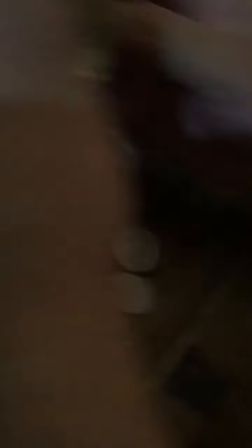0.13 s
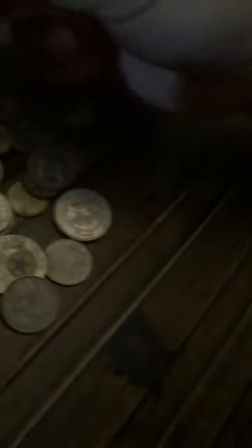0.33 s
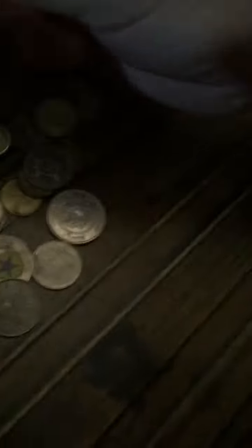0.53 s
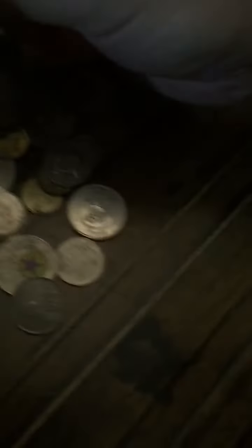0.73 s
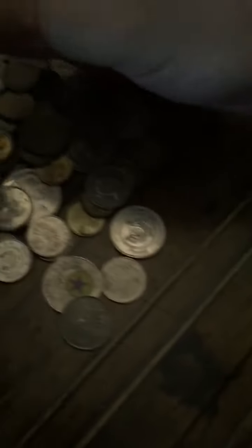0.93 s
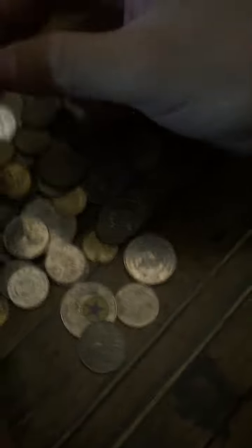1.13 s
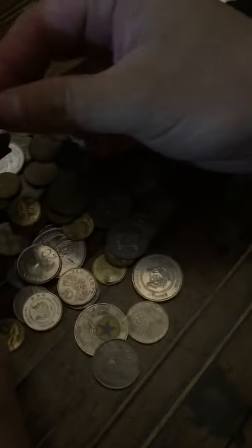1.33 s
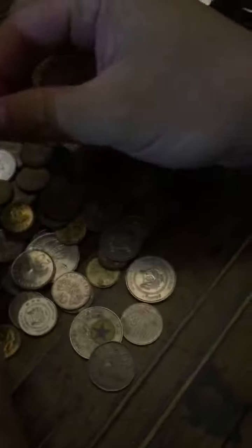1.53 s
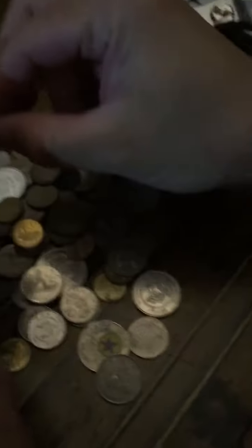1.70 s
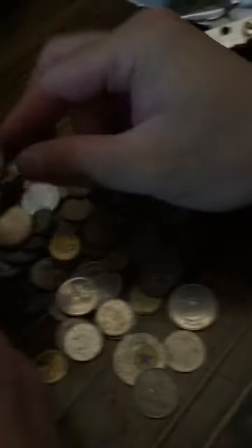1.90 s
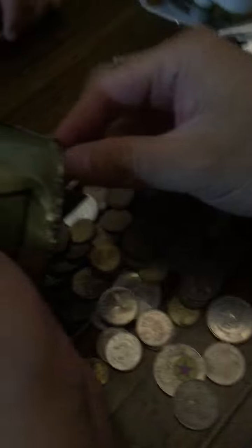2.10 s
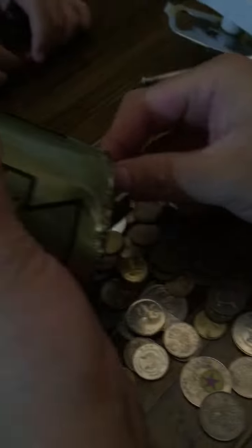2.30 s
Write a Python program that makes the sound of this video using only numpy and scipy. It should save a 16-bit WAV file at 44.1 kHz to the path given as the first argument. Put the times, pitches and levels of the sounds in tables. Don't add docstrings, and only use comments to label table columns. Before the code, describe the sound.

Coins clatter in uneven bursts onto a coin pile on wooden boards, with faint scraping between

```python
import sys
import numpy as np
from scipy import signal
from scipy.fft import rfft, irfft
from scipy.io import wavfile

SR = 44100
rng = np.random.default_rng(int(sys.argv[2]) if len(sys.argv) > 2 else 0)


def store_wav(level_fs):
    pcm = np.round(np.clip(np.atleast_2d(level_fs), -1, 1) * 32767)
    wavfile.write(sys.argv[1], SR, pcm.T.astype(np.int16))


def magnitude_from_level(level_db):
    exponent = np.asarray(level_db, float) / 20
    return 10 ** exponent


N = 103635

COIN_HZ = [13200, 10300, 11200, 11200, 12250, 15050, 12200, 13480, 12140, 14800, 12350, 13500, 12000, 12200,
           14815, 13020, 14820, 13490, 11500, 11500, 12200, 9440, 9440, 13500, 14800, 9440, 14830, 3680,
           12400, 13300, 11900, 7700]
CONTACTS_PER_S = 1000


def read(points, hz):
    f, value = np.transpose(points)
    return np.interp(np.log(hz + 1), np.log(f + 1), value)


def evened(x):
    return x / np.sqrt(np.mean(x ** 2) + 1e-20)


def add(mix, start_s, sound):
    part = mix[round(start_s * SR):][:len(sound)]
    part += sound[:len(part)]


def colour(x, points):
    hz = np.fft.rfftfreq(len(x), 1 / SR)
    return irfft(rfft(x) * magnitude_from_level(read(points, hz)), len(x))


def modes(t, hz, db, t60_s):
    hz, db, t60_s = (np.reshape(v, (-1, 1)) for v in (hz, db, t60_s))
    return (magnitude_from_level(db - 60 * t / t60_s) * np.sin(2 * np.pi * hz * t)).sum(0)


def burst(db, hz, octaves, t60_s):
    t, f = np.arange(2048) / SR, np.fft.rfftfreq(2048, 1 / SR)
    away = np.log2((f + 1) / hz) / octaves
    skirt_db = -6 * away ** 2 * np.where(away < 0, 1.6, 1)
    noise = evened(irfft(rfft(rng.standard_normal(2048)) * magnitude_from_level(skirt_db)))
    return noise * magnitude_from_level(db - 60 * t / t60_s) * np.minimum(t / 0.0006, 1)


def sparse(per_s):
    spread_db = 3
    size = magnitude_from_level(spread_db * np.minimum(rng.exponential(1, N), 2.5)) * rng.choice([-1., 1.], N)
    return evened(size * (rng.random(N) < per_s / SR))


def clumps(per_s):
    return np.interp(np.arange(N) / SR * per_s, np.arange(N // 50), rng.standard_normal(N // 50))


def landing(start_s, tick_db, clack_db, clack_hz):
    chatter_s, clack_t60_s = 0.0025, 0.016
    clack_db = clack_db + 2.5
    delay_s = -chatter_s * np.log(rng.random(12))
    rebound = 1.14 * (2 * rng.random(12) - 1) ** 3
    hits = np.zeros(1000)
    np.add.at(hits, np.minimum(delay_s * SR, 999).astype(int), rebound)
    hits[0] = 1
    coin = burst(tick_db - 5.5, 10900, octaves=1, t60_s=0.0084)
    heap = burst(clack_db, clack_hz, octaves=1, t60_s=clack_t60_s)
    ping = modes(np.arange(2048) / SR, clack_hz, clack_db - 15, 1.4 * clack_t60_s)
    return start_s, np.convolve(coin + heap + ping, hits / np.linalg.norm(hits))


def tick(start_s, db, hz):
    return start_s, burst(db, hz, octaves=0.64, t60_s=0.0069)


def ring(start_s, db, free_s, hz):
    ring_t60_s, catch_t60_s, attack_s = 0.25, 0.02, 0.00078
    twin_ratio, twin_db = 1.011, -11
    waver, flutter_db = 0.002, 3.5
    db = db - 8
    t = np.arange(0, free_s + 0.05, 1 / SR)
    pitch_swing, level_swing = [np.interp(t, np.arange(80) * 0.003, row) for row in rng.standard_normal((2, 80))]
    warped_t = np.cumsum(1 + waver * pitch_swing) / SR
    tone = modes(warped_t, [hz, hz * twin_ratio], [db, db + twin_db], ring_t60_s)
    caught = magnitude_from_level(-60 * np.maximum(t - free_s, 0) / catch_t60_s)
    return start_s, tone * magnitude_from_level(flutter_db * level_swing) * np.minimum(t / attack_s, 1) * caught


def thud(start_s, db, centre_hz):
    # mode_hz, level_db, t60_s
    boards = [(119, -2.5, 0.28), (203.8, -11, 0.35), (280, 2.5, 0.032), (387.7, 2.5, 0.037),
              (480, 2.5, 0.049), (722, 12, 0.015), (940, -3, 0.023), (1460, -17.5, 0.048)]
    hz, mode_db, t60_s = np.transpose(boards)
    away_db = 0.3 * db * abs(np.log2(hz / centre_hz))
    t = np.arange(0, 0.4, 1 / SR)
    sound = modes(t, hz * rng.uniform(0.97, 1.02, len(hz)), db + mode_db + away_db, t60_s)
    add(sound, 0, burst(db + 5.5, centre_hz, octaves=0.79, t60_s=0.036))
    return start_s, sound * (1 - np.exp(-t * centre_hz * 2))


def rattle():
    spill_s = [0, .248, .345, .451, .599, .76, .86, .976, 1.012, 1.173, 1.25, 1.397, 1.68, 1.813, 1.88,
               1.962, 2.04, 2.16, 2.3]
    # level_db, hold_s
    spills = [(-47, 0.23), (-30.5, 0.096), (-42, 0.034), (-26.5, 0.066), (-31, 0.11), (-43, 0.042),
              (-54.5, .09), (-42, 0.027), (-31.5, 0.019), (-30, 0.052), (-35, 0.056), (-33.5, 0.0043),
              (-43.5, 0.025), (-43, 0.079), (-39, 0.077), (-27.5, 0.052), (-38, 0.056), (-44, 0.042),
              (-45, 0.042)]
    # freq_hz, level_db
    grit_spectrum = [(80, -26), (250, 2.5), (1300, 5.5), (3700, 5), (6000, 5), (10500, -1), (13000, -3),
                     (15500, -1.5)]
    settle_t60_s, jingle_t60_s, jingles_per_s, jingle_db = 0.17, 0.015, 1500, -2

    power, t = np.zeros(N), np.arange(0, 0.6, 1 / SR)
    for start_s, (db, hold_s) in zip(spill_s, spills):
        rise_s = 0.0015 * magnitude_from_level(-db - 23)
        fall_db = -60 * np.maximum(t - rise_s - hold_s, 0) / settle_t60_s
        add(power, start_s, np.minimum(t / rise_s, 1) ** 2 * magnitude_from_level(2 * (db + fall_db)))
    level = np.sqrt(power) * magnitude_from_level(3 * clumps(120))

    scuffs = np.zeros(N)
    for _ in range(8):
        contact = rng.standard_normal(120) * magnitude_from_level(-np.arange(120) / 4)
        scuffs += np.convolve(sparse(CONTACTS_PER_S / 8), contact)[:N]
    raw = scuffs / 10 + 0.5 * sparse(CONTACTS_PER_S) + 0.79 * rng.standard_normal(N)
    grit = evened(colour(raw, grit_spectrum))

    jingle = np.zeros(N)
    for hz in COIN_HZ:
        coin = modes(t[:2000], hz * rng.uniform(0.98, 1.04), 0, jingle_t60_s)
        jingle += signal.oaconvolve(level * sparse(jingles_per_s / len(COIN_HZ)), coin)[:N]
    jingle /= np.sqrt(len(COIN_HZ) * jingle_t60_s * SR / 28)
    return level * grit + magnitude_from_level(jingle_db) * jingle


def scrape():
    # time_s, level_db
    stir = [(0, -41.5), (.4, -40.5), (.8, -49), (.9, -57), (1.03, -43.5), (1.15, -51), (1.3, -56),
            (1.45, -41), (1.549, -50), (1.65, -74.5), (1.721, -53.5), (1.8, -51), (1.95, -47.5),
            (2.35, -53)]
    friction = (rng.standard_normal(N) + 0.19 * sparse(CONTACTS_PER_S)) * magnitude_from_level(3 * clumps(70))
    hz, t, z = signal.stft(friction, SR, nperseg=256)
    hz = hz[:, None]
    db = np.interp(t, *np.transpose(stir))
    edge_hz = 1720 * 2 ** ((db + 79) / 32)
    heap_resonance = 1 + 0.68 * np.exp(-((hz - 1300) / 240) ** 2)
    shape = np.minimum(hz / 900, 1) / (1 + (hz / edge_hz) ** 4) * heap_resonance
    return signal.istft(z * shape / np.sqrt((shape ** 2).mean(0)) * magnitude_from_level(db), SR, nperseg=256)[1][:N]


def room(x):
    # freq_hz, t60_s
    decay = [(100, 0.55), (500, 0.4), (2000, 0.18), (6000, 0.25), (15000, 0.18)]
    taps = np.zeros(SR // 2)
    at = np.arange(200, len(taps) - 20, 20)
    taps[at + rng.integers(0, 20, len(at))] = rng.choice([-1., 1.], len(at))
    hz, t, z = signal.stft(taps, SR, nperseg=256)
    tail = signal.istft(z * magnitude_from_level(-60 * t / read(decay, hz)[:, None]), SR, nperseg=256)[1]
    return signal.fftconvolve(x, tail / np.linalg.norm(tail))[:N]


def hush():
    # freq_hz, level_db
    hush_spectrum = [(25, -8), (70, 3.5), (130, -9.5), (400, -15), (1500, -35.5), (5000, -34), (15000, -43)]
    swelling = rng.standard_normal(N) * magnitude_from_level(4.6 * clumps(9.71))
    return magnitude_from_level(-54) * evened(colour(swelling, hush_spectrum))


def scene():
    # start_s, tick_db, clack_db, clack_hz
    first_landings = [(0.0135, -16, -29.5, 1460), (0.0485, -10.5, -25, 1860), (0.1161, -14.5, -24, 2280),
                      (0.161, -49, -24, 1730), (0.1878, -15.5, -57, 2620), (0.248, 2, -11, 2600),
                      (0.2951, -1, -17.5, 1710), (0.3255, -26, -20.5, 2260), (0.347, -15, -16, 2240),
                      (0.3945, -6.5, -16, 3460), (0.4358, -6, -18, 1540), (0.4507, 7.5, -7, 1230),
                      (0.4814, 1.5, -23, 1450), (0.51, -3.5, -44, 2950), (0.599, -2.5, -15, 1310),
                      (0.6225, -2, -20, 1150), (0.6618, 3, -23.5, 2120), (0.6938, -4, -44, 2810),
                      (0.7216, -10, -31.5, 1170), (0.7932, -24.5, -31, 4500), (0.9175, -28, -35.5, 3500),
                      (0.976, -34, -25.5, 3430)]
    second_landings = [(1.0107, -36, -17.5, 2220), (1.0514, -26, -23.5, 4030), (1.0962, -29, -27, 2770),
                       (1.1212, -23, -31, 3020), (1.1727, 6.5, -16.5, 1327), (1.2205, -17, -25, 3640),
                       (1.249, -31, -11, 2320), (1.2905, -27, -26, 2650), (1.3058, -33, -45, 2520),
                       (1.3797, -15, -25, 3780), (1.3982, -10, -65, 3860), (1.725, -13, -19.5, 4090),
                       (1.93, -32, -28.5, 3030), (1.9509, -6, -22, 2470), (1.9623, 10, -6.5, 1595),
                       (2.005, 4, -26, 4600), (2.0811, -12, -25, 3570), (2.134, -32, -28.5, 2630),
                       (2.2153, -31, -25.5, 2530), (2.2375, -23.5, -32.5, 3770), (2.292, -22.5, -35, 3400)]
    # start_s, level_db, centre_hz
    ticks = [(0.0874, -27, 8900), (0.2905, -17, 8250), (0.5997, -0.5, 9300), (0.627, 4, 12800),
             (.631, -7, 12700), (.6635, -12, 6440), (0.672, -12, 11000), (.7345, -17, 10000),
             (0.7403, -20, 10000), (0.8035, -38, 11100), (0.863, -36, 5900), (.8924, -44, 6860),
             (0.958, -32, 8900), (0.988, -25, 13100), (0.9977, -33, 3580), (1.0206, -22, 3350),
             (1.024, -27, 11500), (1.033, -22, 3740), (1.042, -28, 8500), (1.055, -36, 4000),
             (1.0695, -34, 6000), (1.1764, -3, 6530), (1.2, -11, 13020), (1.154, -27.5, 6000),
             (.977, -30, 3600), (1.254, -13, 2560), (.252, -10, 9000), (.516, -6, 13100),
             (1.905, -19.5, 6900), (1.914, -37, 9000), (1.24, -14, 2480), (1.268, -17, 5000),
             (1.276, -28, 5000), (1.284, -26, 3020), (1.312, -23.5, 3060), (1.406, -15, 3800),
             (1.422, -18.5, 7700), (1.4301, -20, 4950), (1.5293, -51, 3420), (1.69, -35.5, 3200),
             (1.722, -22, 7100), (1.73, -37, 5050), (1.791, -37, 1400), (1.8158, -33, 8850),
             (1.831, -34, 1300), (1.84, -25.5, 3020), (1.993, -8, 5960), (2.037, -19, 8500),
             (2.169, -31, 5000), (2.1929, -31, 5000), (2.3283, -29, 4970)]
    # start_s, level_db, free_s
    rings = [(.008, -22.5, 0.006), (.088, -34, 0.15), (.088, -31, 0.034), (.165, -37, .05),
             (.25, -11.5, 0.033), (.285, -16, 0.04), (.288, -28.5, 0.027), (.451, -6, 0.011),
             (.602, -12, 0.062), (.661, -9, 0.034), (.667, -10, 0.08), (.722, -12.5, 0.013),
             (.798, -25.5, 0.025), (1.122, -33, 0.062), (1.174, -8, 0.057), (1.185, -12, 0.061),
             (1.235, -45, 0.11), (1.305, -23, 0.011), (1.428, -22, 0.0059), (1.757, -38, .005),
             (1.06, -34, .04), (1.963, -10, 0.058), (2.038, -27, 0.078), (2.0, -14, 0.049),
             (2.005, -12, 0.029), (2.083, -27, 0.035), (2.083, -25, 0.021), (.9765, -16, .002),
             (.465, -17, .03), (.49, -13.5, .03), (.51, -17, .02), (1.38, -19, .002)]
    # start_s, thud_db, centre_hz
    thuds = [(0.016, -36.5, 405), (0.052, -37, 300), (0.1881, -39.5, 415), (0.248, -29.5, 398),
             (0.2968, -31.5, 352), (.348, -33, 500), (.4505, -18, 413), (.599, -21.5, 385),
             (.622, -27.5, 397), (.662, -33.5, 302), (.722, -32.5, 310), (1.122, -43.5, 480),
             (1.173, -26.5, 417), (1.225, -37, 480), (1.287, -38, 480), (1.409, -40.5, 480),
             (1.65, -44, 296), (1.962, -18, 380), (2.214, -36.5, 490), (2.329, -43, 480)]

    coins = rattle() + scrape()
    voices = [(landing, first_landings), (landing, second_landings), (tick, ticks),
              (ring, np.c_[rings, COIN_HZ]), (thud, thuds)]
    for voice, events in voices:
        for event in events:
            add(coins, *voice(*event))
    return (coins + magnitude_from_level(-13) * room(coins) + hush())[None]


def top_cut(x):
    return signal.sosfilt(signal.butter(12, 16640, fs=SR, output="sos"), x)


def record(dry):
    bass_cut_hz, ceiling, edge_hz = 85, 0.72, 15400
    thin = signal.sosfilt(signal.butter(2, bass_cut_hz, "high", fs=SR, output="sos"), dry)
    overloaded = np.tanh(thin / ceiling) * ceiling
    low_pass = signal.firwin(401, edge_hz, window=("kaiser", 4), fs=SR)
    return top_cut(signal.oaconvolve(overloaded, low_pass[None], "same"))


dry = scene()
out = record(dry)
store_wav(out)
```